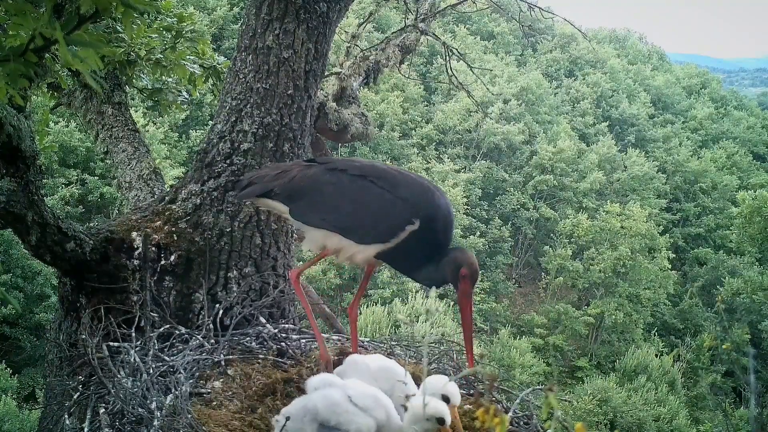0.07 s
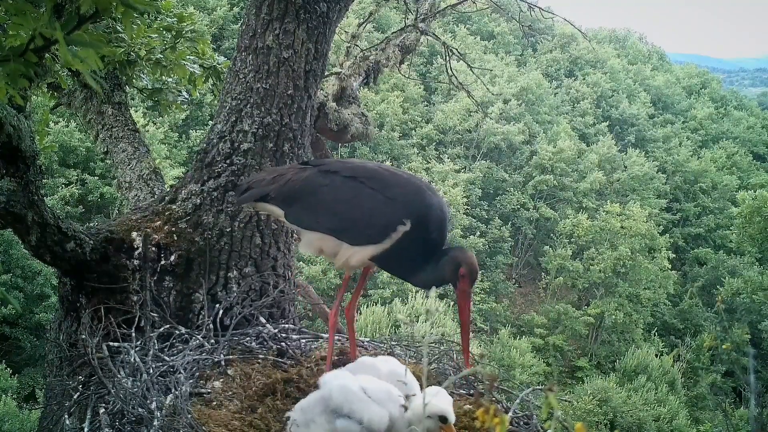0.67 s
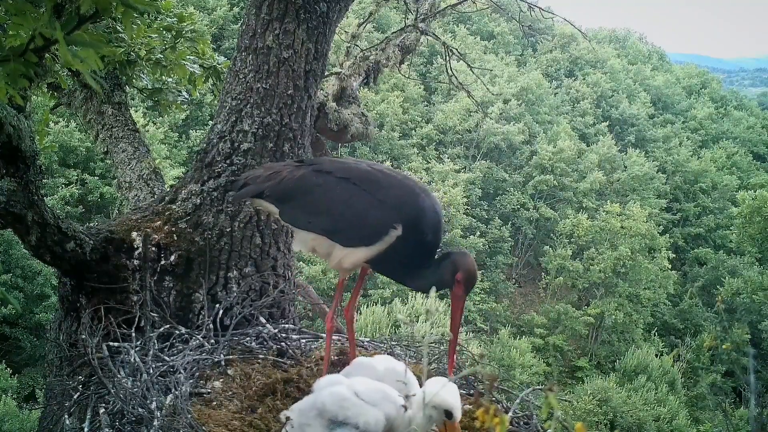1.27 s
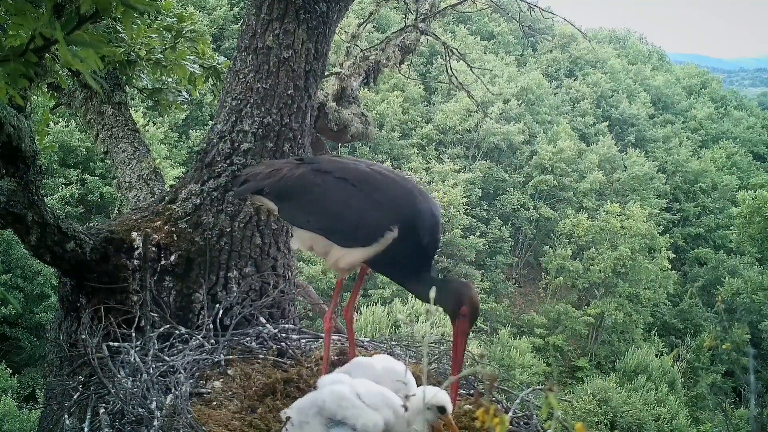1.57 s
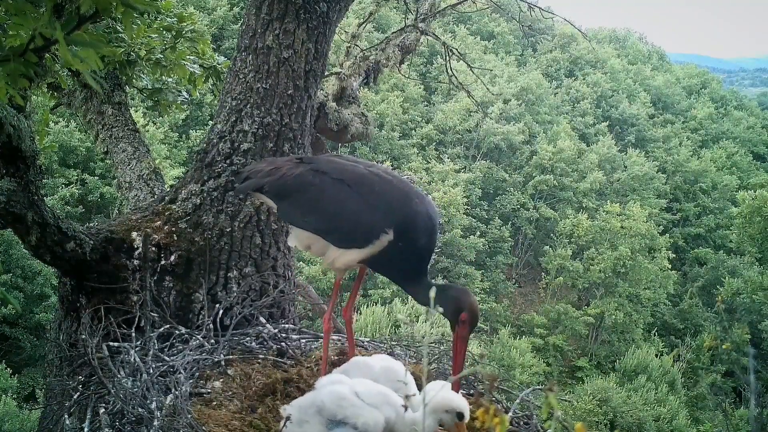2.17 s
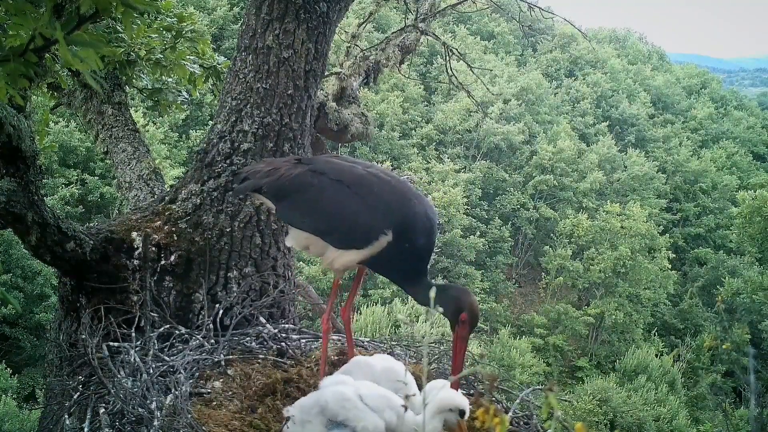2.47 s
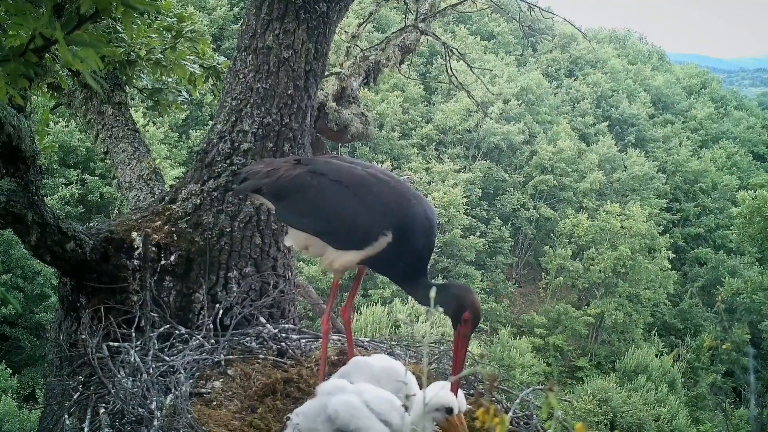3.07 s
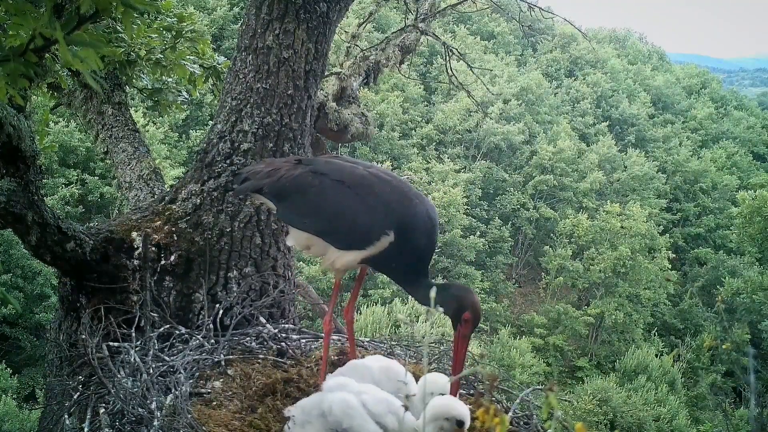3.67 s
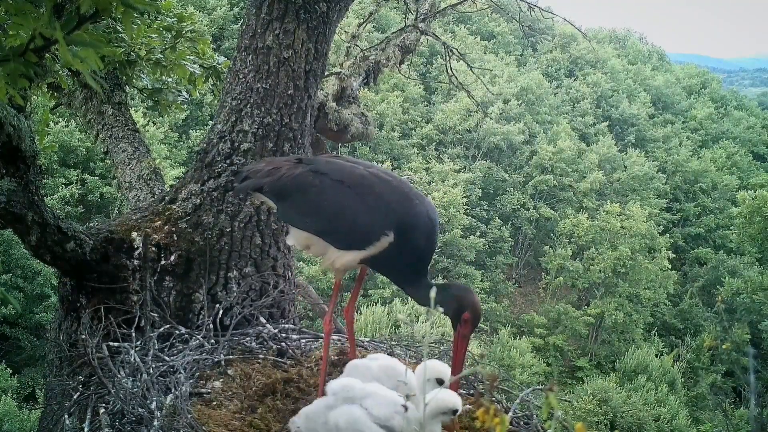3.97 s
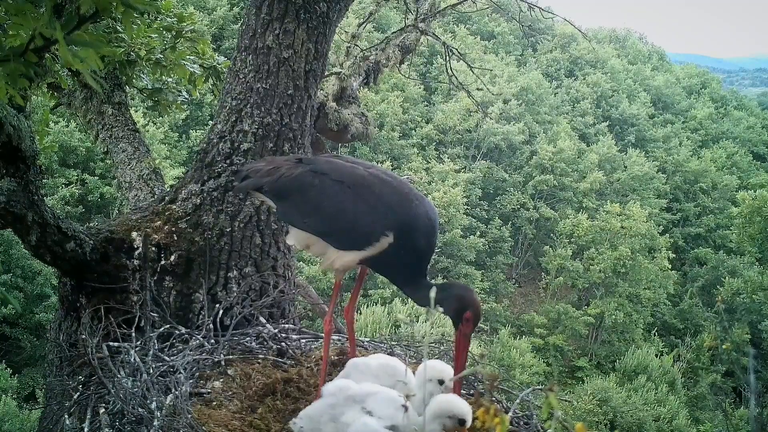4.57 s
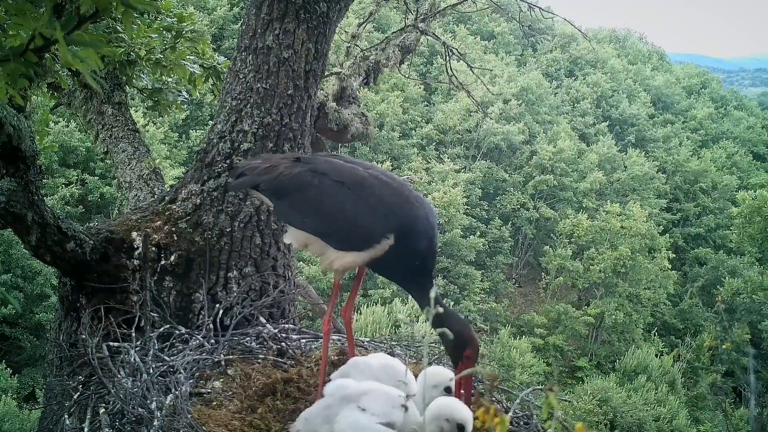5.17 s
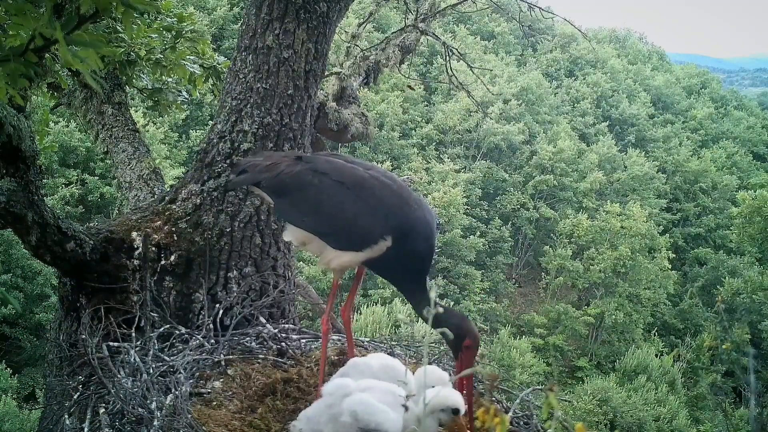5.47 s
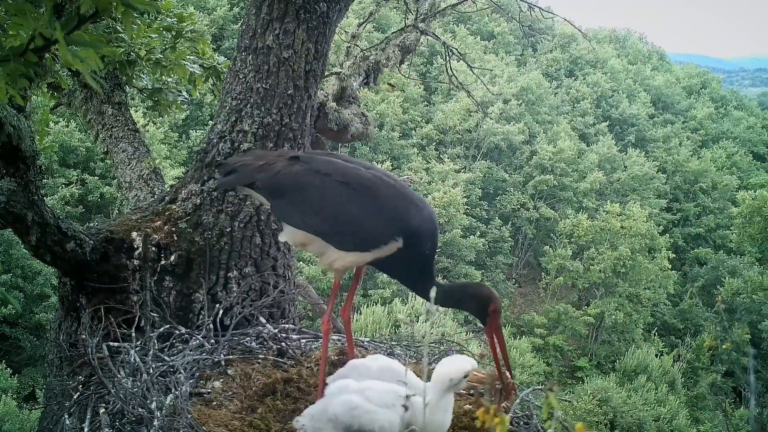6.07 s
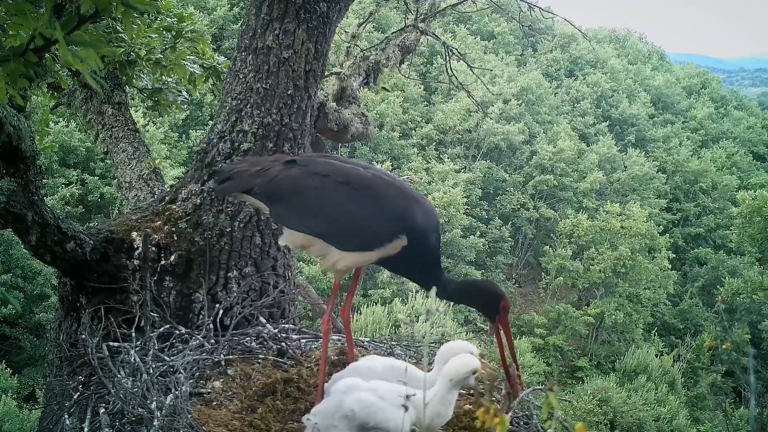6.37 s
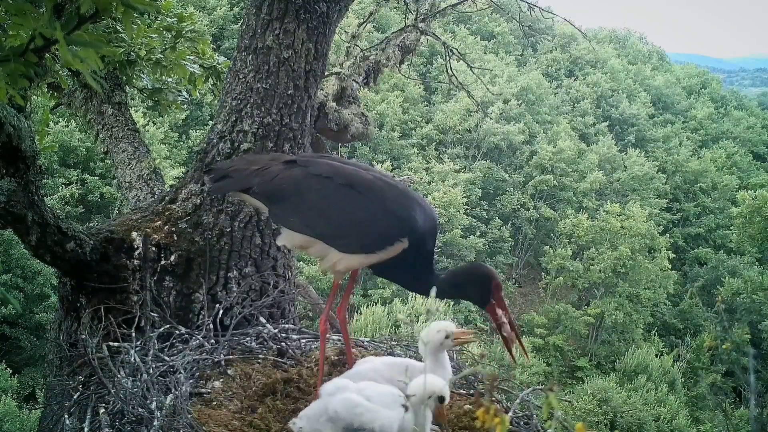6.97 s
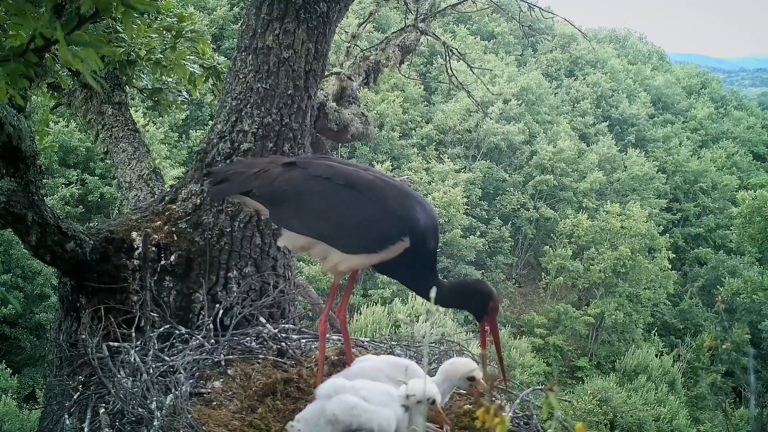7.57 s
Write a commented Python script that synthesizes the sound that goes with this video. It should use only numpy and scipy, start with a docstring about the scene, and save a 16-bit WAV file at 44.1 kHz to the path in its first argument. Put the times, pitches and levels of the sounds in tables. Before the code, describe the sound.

In a hushed forest, young storks give quick high yips, peeps and creaky screeches while bills clop softly and their nest rustles.

```python
"""Stork chicks begging in a nest

Thin voices beg in bursts of U-shaped yips, about eight a second, with quick arched peeps and long
screeches that break up into creaks. Each voice is a whistling membrane in the syrinx, the bird's
voice box. Bills clop softly, the nest rustles, and the trees of a quiet forest hush behind."""
import sys
import numpy as np
from scipy import signal
from scipy.fft import rfft, irfft, next_fast_len
from scipy.io import wavfile
from scipy.ndimage import map_coordinates

SR = 44100
rng = np.random.default_rng(int(sys.argv[2]) if len(sys.argv) > 2 else 0)


def materialize(psi):
    """Save the field psi as 16-bit PCM at rate SR to the path in sys.argv[1].

    A 1-D psi becomes a single channel; in a 2-D psi each row is a channel.
    """
    bounded = np.clip(np.atleast_2d(psi).T, -1, 1)
    quanta = np.round(bounded * 32767).astype(np.int16)
    wavfile.write(sys.argv[1], SR, quanta)


N = 344862


def amp(db):
    """Turn decibels into a gain."""
    return 10 ** (np.asarray(db) / 20)


def unit(x):
    """Scale to an average (rms) level of 1."""
    return x / np.sqrt(np.mean(x ** 2) + 1e-20)


def wobble(rate_hz, size):
    """A smooth curve through rate_hz random points a second."""
    points = rng.standard_normal(8192)
    return map_coordinates(points, [np.arange(size) * rate_hz / SR], mode="wrap")


def colour(x, points):
    """Shape the lows and highs of x along (frequency [Hz], gain [dB]) points."""
    size = next_fast_len(N + 8192)
    hz, db = np.transpose(points)
    gain = amp(np.interp(np.log(np.fft.rfftfreq(size, 1 / SR) + 1), np.log(hz), db))
    return irfft(rfft(x, size) * gain, size)[:N]


def add(track, start_s, x):
    """Mix x into the track from start_s on."""
    i = max(0, round(start_s * SR))
    track[..., i:i + x.shape[-1]] += x[..., :max(0, N - i)]


def contour(rows):
    """Join (time, values...) rows with straight lines: one curve per value."""
    times, *columns = np.transpose(rows)
    t = np.arange(times[0], times[-1], 1 / SR)
    return [np.interp(t, times, column) for column in columns]


def fade_db(t, attack_s, release_s):
    """Level of a call that fades in and out."""
    ramp = np.minimum(t / attack_s, (t[-1] - t) / release_s)
    return 20 * np.log10(np.clip(ramp, .01, 1))


# Tone colour of the trees' hush: (frequency [Hz], gain [dB])
HUSH_COLOUR = [(12, -71), (20, -2), (92, -1), (161, -2.5), (224, -2.5), (681, -10), (761, -10.5),
               (1330, -14.5), (1660, -14), (2590, -18), (3320, -16.5), (3710, -18.5), (6120, -19.5),
               (10100, -23), (15300, -24.5)]
# A far bird's whistle: (time [s], pitch [Hz], level [dB])
FAR_WHISTLE = [(2.645, 3510, -68), (2.661, 3420, -47), (2.685, 3150, -60.5), (2.71, 2830, -47),
               (2.76, 2427, -57)]


def forest():
    """A steady hush of trees and air, and one far falling whistle."""
    out = amp(-46.5 + 0.61 * wobble(2.03, N)) * unit(colour(rng.standard_normal(N), HUSH_COLOUR))
    hz, db = contour(FAR_WHISTLE)
    pitch = hz * (1 + 0.0214 * wobble(303, len(hz)))
    add(out, FAR_WHISTLE[0][0], amp(db) * np.sin(2 * np.pi * np.cumsum(pitch) / SR))
    return out


def tree_echo(x, trunk_db, trunk_s, crowns_db, crowns_s):
    """The trunk throws the sound back at once, the treetops faintly and for longer."""
    t = np.arange(SR) / SR
    trunk, crowns = rng.standard_normal((2, SR)) * amp(-60 * t / np.array([[trunk_s], [crowns_s]]))
    tail = amp(trunk_db) * trunk / np.linalg.norm(trunk)
    tail += amp(crowns_db) * crowns / np.linalg.norm(crowns)
    return x + signal.fftconvolve(x, tail)[:N]


# Shifts of the nest lining: (time [s], half-length [s], level [dB])
LINING_SHIFTS = [(1.073, 0.033, -45), (1.294, 0.019, -43.5), (3.735, 0.056, -39), (6.268, 0.065, -48),
                 (7.383, 0.032, -44.5)]
# Tone colours of the lining and of a twig or bill tick: (frequency [Hz], gain [dB])
LINING_COLOUR = [(100, -15), (280, -5.5), (500, -9.5), (800, -12.5), (1300, -32), (5000, -31), (15000, -49)]
TICK_COLOUR = [(300, 7), (1300, -2.5), (2600, -3), (3600, -1.5), (6000, -6), (9000, -13.5), (15000, -46)]


def nest():
    """The lining rustles dully as it shifts, and tiny twigs tick."""
    t = np.arange(N) / SR
    movement = sum(amp(db) * np.exp(-((t - s) / width) ** 2) for s, width, db in LINING_SHIFTS)
    rustle = unit(colour(rng.standard_normal(N) * amp(5.3 * wobble(180, N)), LINING_COLOUR))
    twigs = (rng.random(N) < 6 / SR) * rng.standard_normal(N)  # about six a second
    return movement * rustle + amp(-22) * colour(twigs, TICK_COLOUR)


# Soft bill clops: (time of the knock [s], knock level [dB], tick level [dB])
BILL_CLOPS = [(.271, -19, -28), (.511, -21, -29), (.734, -22, -28.5), (.91, -23.5, -37),
              (1.071, -20.5, -27), (1.672, -23.5, -29.5), (1.882, -18.5, -24), (2.228, -19, -25),
              (2.828, -25, -26.5), (2.862, -22.5, -27), (3.845, -22, -41), (4.783, -21, -32),
              (5.091, -24.5, -32), (5.557, -20.5, -32.5), (5.96, -25, -30), (6.221, -27, -35),
              (6.466, -24, -27), (6.584, -19.5, -36), (6.931, -25, -27.5), (7.185, -21.5, -28),
              (7.659, -19, -34)]
# Tone colour of the hollow knock: (frequency [Hz], gain [dB])
KNOCK_COLOUR = [(110, -47), (280, 7), (450, -2), (750, 0), (1200, -27.5), (2600, -8), (6000, -28)]


def bill_clops():
    """A bill ticks, then gives a hollow knock 7 ms later."""
    knocks, ticks = np.zeros((2, N))
    t = np.arange(SR // 20) / SR
    for s, knock_db, tick_db in BILL_CLOPS:
        age = t / 0.0002
        push = 2.65 * (1 - age) * np.exp(-age)
        noisy_tail = amp(-60 * t / 0.032) * rng.choice([-1, 1], len(t))
        add(knocks, s, amp(knock_db) * (push + noisy_tail))
        add(ticks, s - .007, amp(tick_db + 4 - 60 * t / 0.015) * rng.standard_normal(len(t)))
    return colour(knocks, KNOCK_COLOUR) + colour(ticks, TICK_COLOUR)


# Faint whimpers: (middle time [s], pitch [Hz])
LOW_WHIMPERS = [(.645, 873), (1.572, 930), (2.553, 940), (3.553, 954), (4.525, 814), (5.27, 864),
                (6.021, 1190), (6.152, 1250), (6.259, 1045), (7.38, 970)]


def whimpers():
    """As a call runs out, the voice sinks to a soft, sagging low tone."""
    out = np.zeros(N)
    position = np.linspace(-1, 1, SR // 25)
    swell = amp(-42) * np.cos(np.pi * position / 2) ** 2
    for s, hz in LOW_WHIMPERS:
        pitch = hz * (1 - .06 * position + .1 * wobble(276, len(swell)))
        add(out, s - len(swell) / SR / 2, swell * np.sin(2 * np.pi * np.cumsum(pitch) / SR))
    return out


# Runs of snaps: (time of the slow end [s], time of the fast end [s], level at the fast end [dB])
SNAP_RUNS = [(0.735, .693, -28), (1.063, 1.099, -12), (2.59, 2.548, -41), (3.679, 3.797, -19),
             (5.293, 5.268, -27), (6.483, 6.44, -26.5), (6.575, 6.6, -27), (6.938, 6.9, -25),
             (7.396, 7.365, -27.5), (7.649, 7.672, -21.5)]
# How the throat colours them: (frequency [Hz], gain [dB])
CREAK_COLOUR = [(300, -25), (1200, -21), (1900, 2), (2800, -3), (3700, 8), (4600, -8), (5700, -7.5),
                (8000, -13.5), (15000, -43)]


def creaks(slow_hz=84, fast_hz=241):
    """At the edges of a call the membrane gives single snaps, slower and weaker farther from it."""
    out = np.zeros(N)
    t = np.arange(SR // 100) / SR
    ring = 0.66 * np.sin(2 * np.pi * 2900 * t)
    for slow_s, fast_s, fast_db in SNAP_RUNS:
        rate, db = contour(sorted([(slow_s, slow_hz, fast_db - 11.5), (fast_s, fast_hz, fast_db)]))
        cycle = np.floor(np.cumsum(rate) / SR)
        for i in np.flatnonzero(np.diff(cycle, prepend=-1)):  # one snap per cycle
            snap = amp(-60 * t / .013) * (rng.standard_normal(len(t)) + ring)
            add(out, min(slow_s, fast_s) + i / SR, amp(db[i] + rng.normal(0, 1.6)) * snap)
    return colour(out, CREAK_COLOUR)


def syrinx(hz, db, rough, flutter_hz, flutter, jitter, shimmer_db,
           side_hz, side_db, second_db, third_db, fray, rasp_db):
    """A whistling membrane that flutters and turns chaotic when rough; returns tone and rasp."""
    n = len(hz)
    rough = np.clip(rough, 0, 1)
    beat = np.sin(2 * np.pi * np.cumsum(flutter_hz * np.exp(0.331 * wobble(140.2, n))) / SR)
    pitch = hz * (1 + jitter * rough * (wobble(748.7, n) + .5 * beat) + 0.0064 * wobble(201.0, n))
    phase = 2 * np.pi * np.cumsum(pitch) / SR
    tremble = 1 + np.clip(flutter * rough ** 0.61, 0, 1) * beat
    shimmer = amp(shimmer_db * rough * wobble(629.0, n))
    # a slower vibration of the membrane puts side tones around the whistle
    slow = np.sin(2 * np.pi * np.cumsum(side_hz * (1 + 0.2194 * wobble(296.7, n))) / SR)
    # overtones waver, grow with the pressure and thin out as the pitch climbs
    ragged = phase + fray * wobble(893.5, n)
    bite = amp(.15 * (db + 27) + 3 * wobble(220, n)) * (2800 / hz) ** 3
    overtones = amp(second_db) * np.sin(2 * ragged) + amp(third_db) * np.sin(3 * ragged)
    tone = np.sqrt(2) * (np.sin(phase) + bite * overtones) * (1 + amp(side_db) * rough * slow)
    # at full roughness the whistle gives way to a grainy wheeze
    tone *= 1 - 0.96 * rough ** 4
    wheeze = (rough ** 3 + .13) * unit(rng.standard_normal(n) * amp(2.5 * wobble(450, n)))
    to_edge_s = np.minimum(np.arange(n), np.arange(n)[::-1]) / SR
    level = amp(db) * unit(tremble * shimmer) * np.clip(to_edge_s / 0.00023, 0, 1)
    return level * np.array([tone, amp(rasp_db) * wheeze])


# Cracks in the voice: (middle time [s], level [dB])
VOICE_CRACKS = [(1.548, -35), (1.898, -35.5), (2.879, -39.5), (4.507, -38.5), (4.8, -31.5), (6.6, -38.5),
                (7.205, -33.5), (7.757, -30.5), (7.812, -31.5)]


def voice_cracks(hz=1789, length_s=0.014):
    """The voice drops into its low range for a moment."""
    out = np.zeros((2, N))
    t = np.arange(0, length_s, 1 / SR)
    for s, db in VOICE_CRACKS:
        level = db + fade_db(t, length_s / 2, length_s / 2)
        call = syrinx(np.full(len(t), hz), level, rough=0.45, flutter_hz=200, flutter=0.24, jitter=.1,
                      shimmer_db=2, side_hz=950, side_db=-14,
                      second_db=-24, third_db=-28, fray=.2, rasp_db=-2)
        add(out, s - length_s / 2, call)
    return out


# Peeps: (time of the top [s], rise [s], fall [s], top pitch [Hz], level [dB])
PEEP_ARCHES = [(1.04, 0.019, 0.0068, 4050, -20), (1.108, 0.016, 0.054, 4250, -21),
               (1.525, 0.02, 0.022, 3270, -20.5), (1.758, 0.0018, 0.0044, 2830, -14),
               (1.917, .014, 0.0174, 3100, -29), (2.888, 0.01, .036, 3860, -30.5),
               (4.819, 0.017, 0.013, 4010, -26), (4.935, 0.022, 0.0073, 3940, -30),
               (5.176, 0.031, 0.0093, 4050, -23.5), (5.187, 0.0033, .013, 3136, -21.5),
               (5.791, 0.0031, 0.01, 2870, -15), (5.946, 0.021, 0.006, 4000, -23.5),
               (6.302, 0.0029, 0.0117, 3504, -28), (6.617, 0.015, 0.0073, 3460, -20),
               (6.633, 0.0061, 0.019, 3310, -19.5), (6.658, 0.0067, .009, 3240, -20.5),
               (7.214, .007, 0.0105, 3130, -27), (7.233, 0.01, 0.021, 3480, -19),
               (7.264, 0.012, 0.013, 3320, -17.5), (7.677, 0.011, 0.0022, 3930, -22.5),
               (7.698, 0.011, 0.013, 3390, -22.5), (7.738, 0.011, .011, 3640, -17)]


def peeps(foot_hz=2390, edge_s=0.0039):
    """Quick, nearly pure whistles that arch up from foot_hz and back, weaker toward the top."""
    out = np.zeros((2, N))
    for s, rise, fall, top_hz, db in PEEP_ARCHES:
        t = np.arange(0, rise + fall, 1 / SR)
        arch = np.sin(np.interp(t, [0, rise, rise + fall], [0, np.pi / 2, np.pi]))
        pitch = foot_hz + (top_hz - foot_hz) * np.abs(arch) ** 1.5  # the power sharpens the top
        level = db - 5 * np.log2(pitch / foot_hz) + fade_db(t, edge_s, edge_s)
        call = syrinx(pitch, level, rough=0.14, flutter_hz=190, flutter=0.1, jitter=0.12,
                      shimmer_db=20, side_hz=1000, side_db=-9.5,
                      second_db=-19.5, third_db=-32, fray=0.22, rasp_db=-1.5)
        add(out, s - rise, call)
    return out


# Screeches: (start [s], length [s], top pitch [Hz], pitch sag [0-1], level [dB],
# swell from start to end [dB], roughness [0-1])
LONG_CALLS = [(.002, 0.13, 2920, 0.35, -27.5, -5.5, 0.43), (0.619, 0.089, 3060, 0.26, -20.5, -0.5, 0.33),
              (1.082, 0.079, 2610, 0.02, -32, 5, 0.54), (1.159, 0.092, 2890, 0, -25.5, -4.5, .55),
              (1.548, 0.035, 2400, 0.1, -35, -6, 0.57), (1.763, 0.1, 2905, 0.29, -26.5, -10.5, 0.19),
              (2.926, 0.1, 2942, 0.18, -27, 6, 0.22), (3.536, 0.036, 2450, .2, -39, -12, 0.65),
              (3.766, 0.047, 3260, .12, -21, 7, 0.18), (3.792, 0.11, 2922, 0.11, -16, 5.5, 0.15),
              (2.54, 0.035, 2460, .2, -43, -5, 0.64), (4.476, 0.038, 2540, 0.17, -27.5, 0, 0.07),
              (5.183, .09, 3050, 0.24, -23, 2, 0.41), (5.799, 0.11, 3043, 0.15, -19.5, 5, 0.38),
              (5.863, 0.077, 2773, 0.05, -16.5, 8.5, 0.15), (6.304, .133, 2914, .1, -27.5, 5, 0.69),
              (6.801, 0.1, 2842, 0.05, -24, 8.5, 0.63), (7.27, 0.1, 2823, 0.18, -23.5, -2.5, 0.55),
              (7.708, .028, 2650, 0.15, -27, 1, 0.1), (7.749, .1, 2702, 0, -27.5, 5, 0.73)]


def screeches(crest=.37, sag_db_per_octave=22):
    """Long calls arch and sag; as they roughen, the other side of the syrinx joins in higher up."""
    out = np.zeros((2, N))
    for s, length, top_hz, sag, db, swell_db, rough in LONG_CALLS:
        t = np.arange(0, length, 1 / SR)
        progress = t / length
        bend = 1 - sag * ((progress - crest) / (1 - crest)) ** 2
        level = db + swell_db * (progress - .5) + sag_db_per_octave * np.log2(bend)
        level += fade_db(t, attack_s=0.0046, release_s=0.023)
        roughness = np.clip(rough + 0.22 * np.exp(-t / 0.0067), .01, 1)  # rougher at the start
        upper_ratio = 1.05 + .08 * np.sin(np.pi * progress)
        upper_db = 1.5 + 20 * np.log10(roughness)
        for ratio, share_db in (1, 0), (upper_ratio, upper_db):
            call = syrinx(top_hz * bend * ratio, level + share_db, roughness, flutter_hz=269.7,
                          flutter=.5, jitter=.05, shimmer_db=2.6, side_hz=956, side_db=-8,
                          second_db=-13.5, third_db=-26.5, fray=.2, rasp_db=0)
            add(out, s, call)
    return out


# The dip at the bottom of each yip's U: (start [s], fall before it [s], length [s], pitch [Hz],
# level [dB], roughness [0-1])
YIP_DIPS = [(0.364, 0.0068, 0.025, 2535, -28, 0.19), (0.472, .03, 0.024, 2630, -26.5, 0.24),
            (0.591, .025, 0.036, 2630, -22.5, 0.26), (0.992, 0.0055, 0.031, 2490, -30.5, 0.34),
            (1.221, 0.017, 0.037, 2710, -21.5, 0.34), (1.336, 0.029, 0.046, 2600, -26, .2),
            (1.451, .021, 0.045, 2514, -26, 0.2), (1.958, 0.033, 0.037, 2360, -33.5, 0.26),
            (2.077, 0.024, 0.037, 2500, -30, 0.45), (2.191, 0.026, 0.043, 2694, -29, 0.52),
            (2.301, 0.013, 0.056, 2606, -25.5, 0.52), (2.425, 0.03, 0.05, 2780, -24, 0.15),
            (2.528, .024, 0.0099, 2620, -32, 0.7), (2.921, .014, 0.063, 2645, -28.5, 0.43),
            (3.056, 0.025, 0.032, 2600, -33.5, 0.65), (3.174, .023, 0.037, 2560, -32, 0.57),
            (3.299, 0.018, 0.036, 2716, -26.5, 0.37), (3.414, 0.026, 0.047, 2766, -24, 0.13),
            (3.524, 0.037, 0.012, 2555, -24, 0.31), (3.941, 0.039, 0.035, 2520, -31, 0.4),
            (4.065, 0.023, 0.026, 2600, -27, 0.25), (4.182, 0.023, 0.029, 2720, -30, 0.31),
            (4.298, 0.016, .036, 2600, -31, 0.37), (4.429, 0.022, 0.042, 2410, -33.5, 0.36),
            (4.875, 0.033, 0.031, 2510, -32.5, 0.42), (4.996, 0.032, 0.017, 2580, -23, 0.2),
            (5.109, 0.03, 0.029, 2475, -28.5, 0.14), (5.648, 0.027, 0.037, 2350, -34.5, 0.37),
            (5.761, 0.03, 0.033, 2440, -28, 0.33), (5.998, 0.027, 0.05, 2413, -29, 0.41),
            (6.121, 0.033, 0.057, 2456, -29, 0.4), (6.233, 0.029, 0.023, 2670, -28, 0.6),
            (6.668, 0.0073, 0.041, 2420, -27, 0.17), (6.772, .036, 0.043, 2630, -31, 0.75)]
# Path of one yip: (stage [below 1 fall, 1-2 dip, above 2 rise], pitch [ratio], level [dB],
# roughness [ratio])
YIP_PATH = [(-.15, 1.58, -3.5, 0.27), (.1, 1.42, -8.5, 0.4), (0.212, 1.31, 1, 0.32), (.52, 1.02, 0.5, 0.35),
            (.65, 1.28, -0.5, 0.4), (0.849, 1, 5, 0.22), (1, .72, -5.5, 1), (1.138, .97, 2, 0.99),
            (1.5, 1, -2, 1.19), (1.86, 1.01, 2, 1), (1.999, .78, -4.5, 1.23), (2.15, 1.02, 5.5, 0.14),
            (2.55, 1.28, 0.5, 0.87), (2.9, 1.5, -1, 1.17), (3.3, 1.52, -5.5, 1.4)]


def yips(rest_hz=2551, pause_s=.13, rise_s=.022, dying_s=0.0083, dying_db=-7.5, full_swoop_s=.028):
    """Each yip swoops into a rough dip, then whistles up again, or dies away if a pause follows."""
    out = np.zeros((2, N))
    stage, ratio, shape_db, rough_share = np.transpose(YIP_PATH)
    in_dip = np.abs(stage - 1.5) < .45
    next_starts = [row[0] for row in YIP_DIPS[1:]] + [np.inf]
    for (s, fall, hold, hz, db, rough), next_s in zip(YIP_DIPS, next_starts):
        ends_burst = next_s - s - hold > pause_s
        rise = dying_s if ends_burst else rise_s
        times = s + fall * np.minimum(stage - 1, 0) + hold * np.clip(stage - 1, 0, 1)
        times += rise * np.maximum(stage - 2, 0)
        # the pitch moves at a limited speed, so a brief glide stays low
        reach = np.minimum(ratio, .8 + np.where(stage > 2, rise, fall) / full_swoop_s)
        pitches = hz * reach * (1 + np.where(in_dip, .012, .03) * rng.standard_normal(len(stage)))
        pitches += in_dip * 1.3 * (rest_hz - hz) * (stage - 1.5)  # drift toward the resting pitch
        glide_db = -17 + 0.41 * db  # glides follow the dip's level only in part
        levels = shape_db + np.where(in_dip, db, glide_db) + ends_burst * (stage >= 2) * dying_db
        levels += rng.normal(0, 1.1, len(stage))
        pitch, level, roughness = contour(np.transpose([times, pitches, levels, rough_share * rough]))
        call = syrinx(pitch, level, roughness, flutter_hz=184.6, flutter=0.35, jitter=0.12,
                      shimmer_db=-1, side_hz=650, side_db=-3,
                      second_db=-14, third_db=-23, fray=.18, rasp_db=-1)
        add(out, times[0], call)
    return out


# How the throat colours the tone and the rasp: (frequency [Hz], gain [dB])
TONE_COLOUR = [(900, -20), (1450, 2), (1750, 6.5), (2100, -8), (2600, 2), (3000, -5), (3500, -4),
               (4400, -14), (5100, -14.5), (5500, -2), (6500, -3), (9000, -9), (14000, -15)]
RASP_COLOUR = [(400, -12.5), (1250, -12.5), (1750, 2), (2100, 4.5), (2650, 8.5), (3300, 8.5), (4400, -1.5),
               (5100, -2), (5700, -1), (6800, -1.5), (9000, -10.5), (12000, -17), (15000, -43)]


def chick_voices():
    """Calls from the syrinx pass through the throat, which favours some pitches."""
    tone, rasp = yips() + peeps() + voice_cracks() + screeches()
    return colour(tone, TONE_COLOUR) + colour(rasp, RASP_COLOUR)


def scene():
    """Chicks and their nest under the trees, in mono."""
    birds = chick_voices() + whimpers() + creaks() + bill_clops() + nest()
    heard = tree_echo(birds, trunk_db=-16, trunk_s=.04, crowns_db=-27, crowns_s=.6)
    return (heard + forest())[None]


def record(dry):
    """Cut off the very highest treble."""
    size = next_fast_len(N + 8192)
    hz = np.fft.rfftfreq(size, 1 / SR)
    return irfft(rfft(dry, size) * (hz < 15400), size)[..., :N]


dry = scene()
out = record(dry)
materialize(out)
```